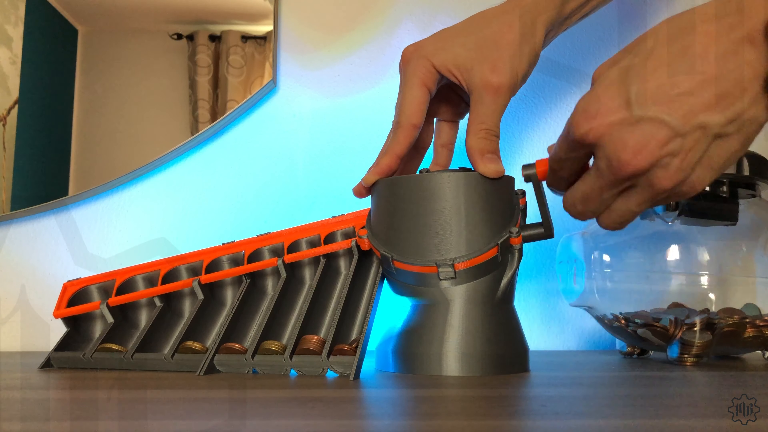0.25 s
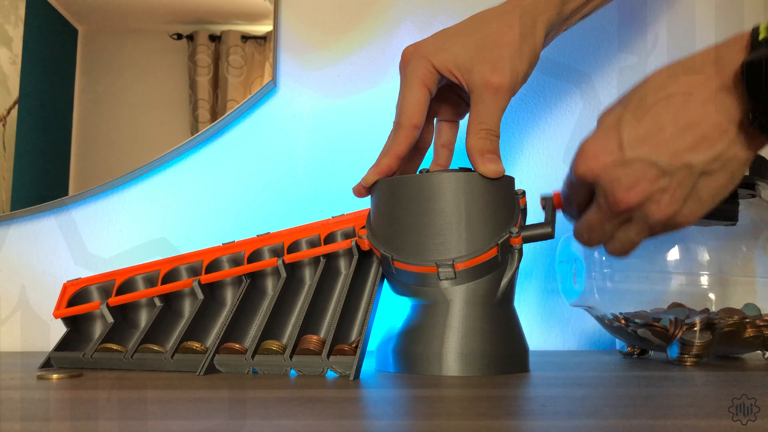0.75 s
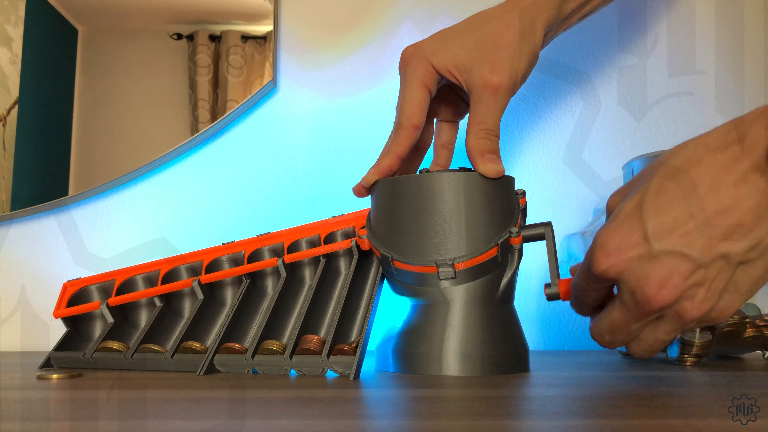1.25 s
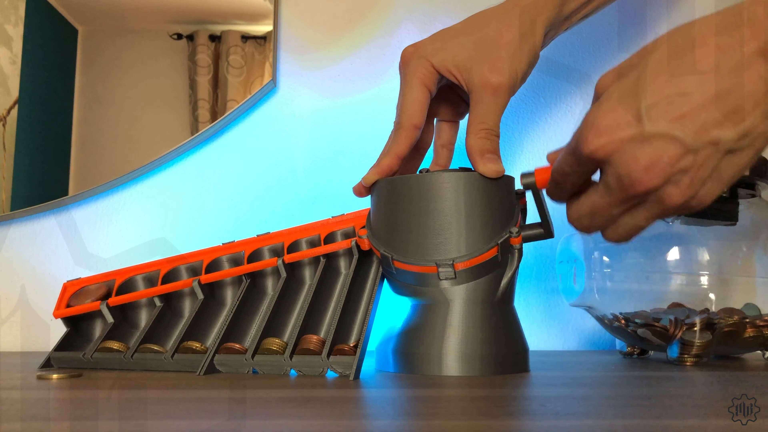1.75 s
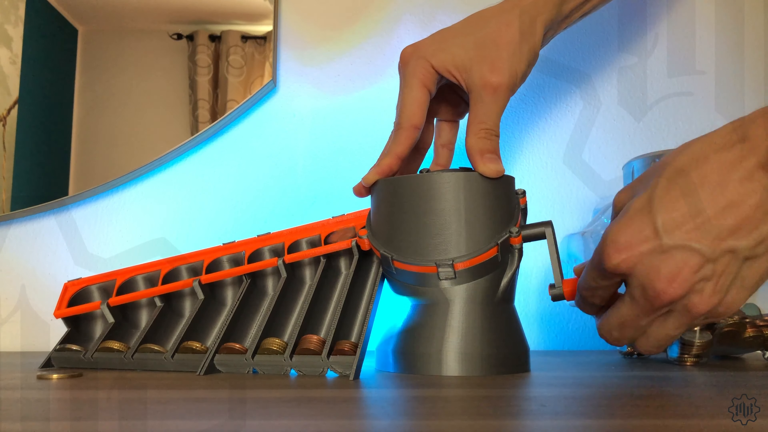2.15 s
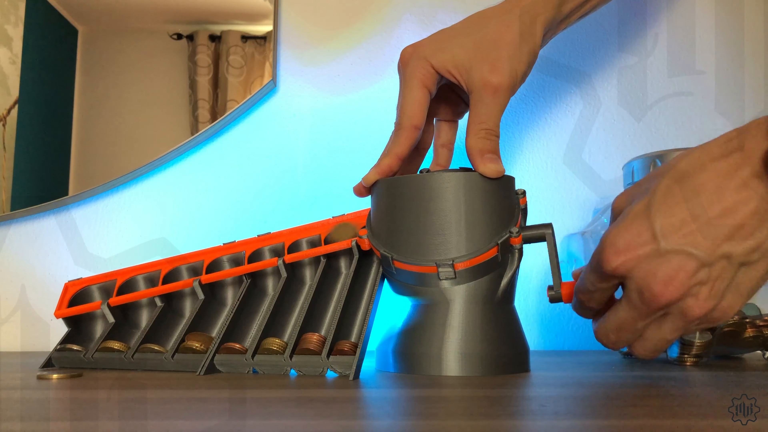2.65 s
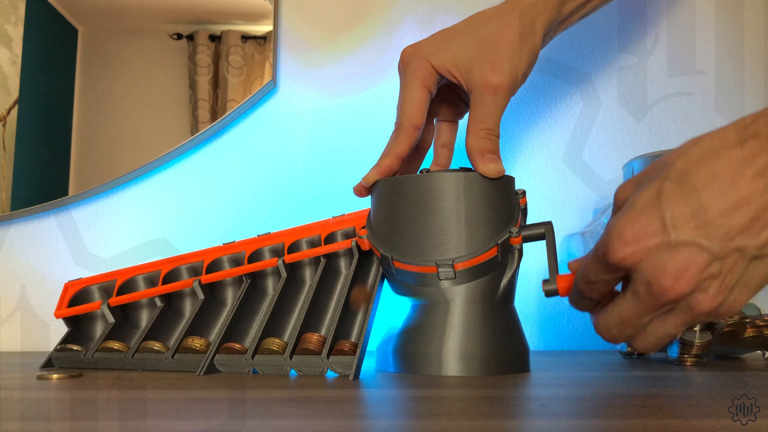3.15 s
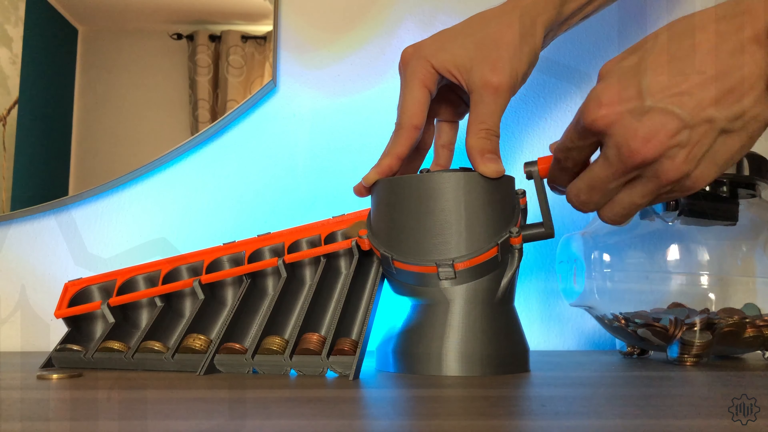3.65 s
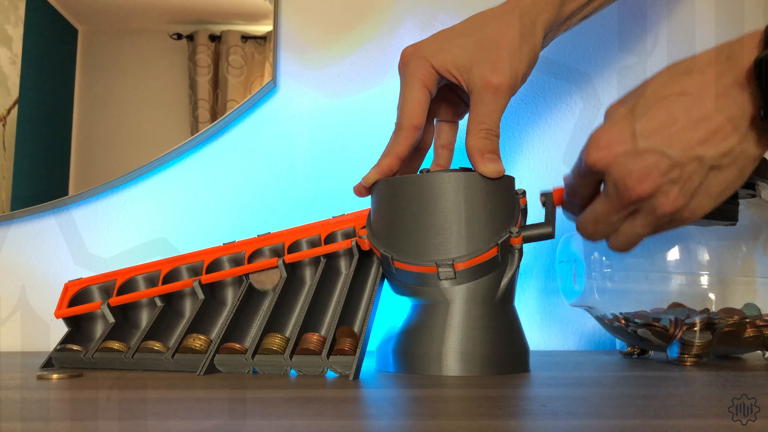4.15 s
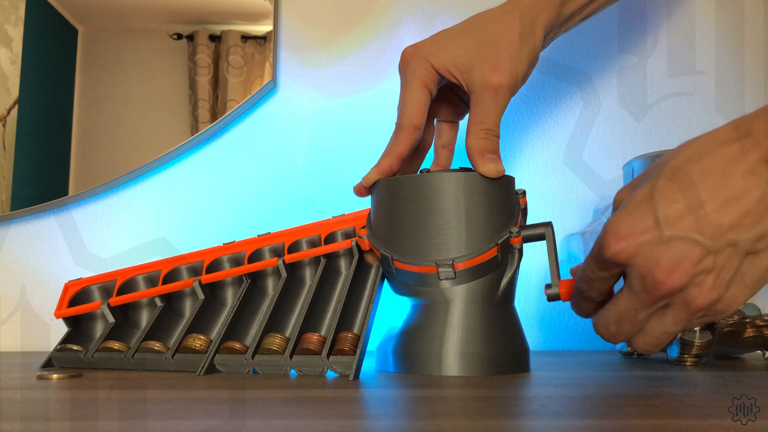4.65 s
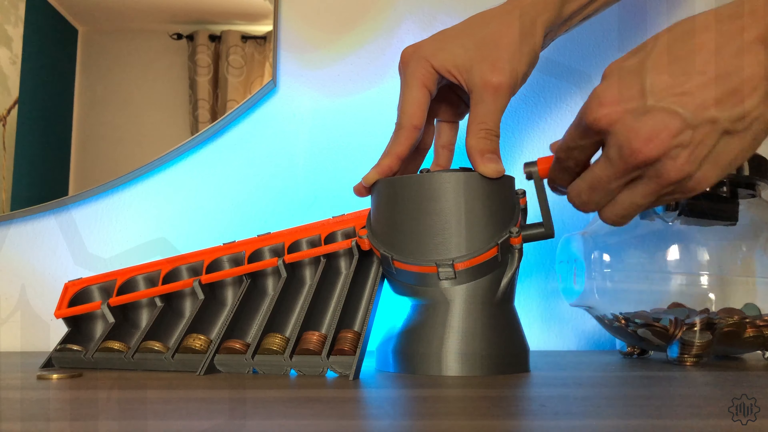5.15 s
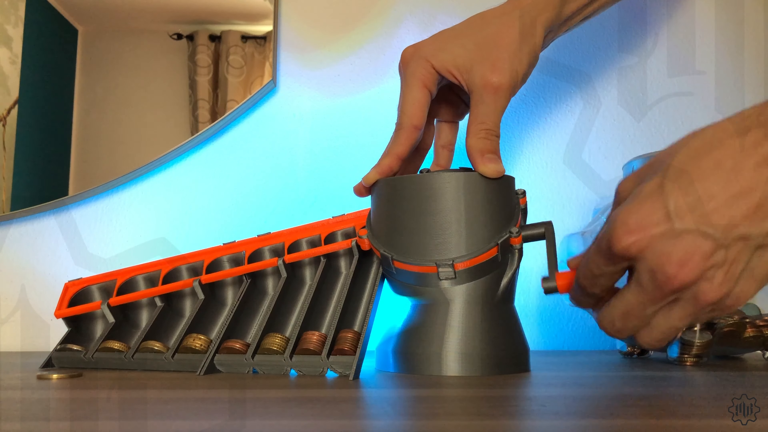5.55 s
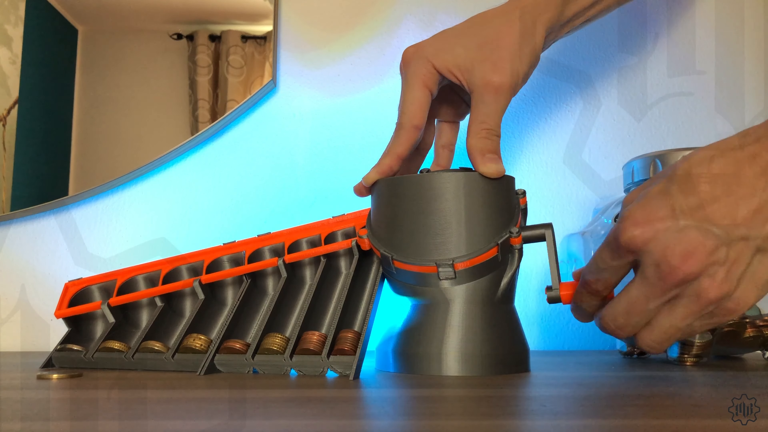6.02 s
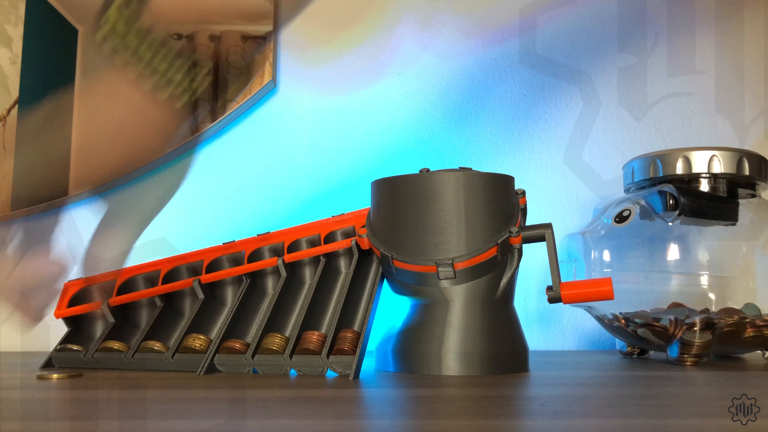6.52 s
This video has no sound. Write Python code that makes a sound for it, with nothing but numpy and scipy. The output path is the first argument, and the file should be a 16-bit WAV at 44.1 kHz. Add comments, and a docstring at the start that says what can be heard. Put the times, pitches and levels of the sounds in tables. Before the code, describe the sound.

Close, dry rattle of metal coins knocking and sliding in a hollow plastic hopper, stopping abruptly into quiet crank friction and a soft brush.

```python
"""Coins clatter in a hand-cranked plastic sorter on a table, miked close in a quiet room.
Each clack is a noise burst through the housing's resonances; slides and drag are dense grains through it.
Chinks, jingle and rim ticks add the metal: damped sine modes and dry clicks.
After five seconds the clatter gives way to a few faint clacks; the crank rubs on softly as filtered
friction, then hands bump and an arm brushes past, over steady room tone."""
import sys
import numpy as np
from scipy import signal
from scipy.fft import rfft, irfft
from scipy.io import wavfile
from scipy.ndimage import uniform_filter1d

SR = 44100
rng = np.random.default_rng(int(sys.argv[2]) if len(sys.argv) > 2 else 0)


def unload_wav(signal):
    """Save mono or channel-first audio to the path in sys.argv[1] as 16-bit WAV at rate SR, clipped to [-1, 1]."""
    wavfile.write(
        sys.argv[1],
        SR,
        np.round(np.clip(np.atleast_2d(signal).T, -1, 1) * 32767).astype(np.int16),
    )


N = 298998

# Levels are before the trims set in scene().
# still room, relative spectrum: [f/Hz, density/dB]
ROOM_TONE = [(15, -22.5), (25, -9.5), (70, 1.5), (210, -9), (400, -9), (750, -19), (2500, -25), (8000, -31),
             (14000, -32.5), (15500, -51)]
ROOM_TONE_DB = -72
# an arm brushing past: [t/s, level/dB]
BRUSH = [(6.34, -110), (6.38, -73), (6.43, -85), (6.52, -91), (6.62, -74.5), (6.7, -79), (6.78, -77.5)]
# spectrum of the brush: [f/Hz, level/dB]
BRUSH_COLOUR = [(100, 1.5), (600, 1), (2000, -6), (6000, -8), (12000, -12.5), (15500, -25)]
# hands bumping the sorter and the table: [t/s, level/dB, f/Hz, t60/s]
BUMPS = [(5.586, -55, 92, 0.19), (5.615, -61, 83.6, 0.2), (6.224, -71, 560, .08),
         (6.375, -64.5, 404, 0.055), (6.379, -64.5, 156, 0.1), (6.404, -73.5, 267, .08),
         (6.44, -67, 201, .1), (6.46, -68.5, 64.9, 0.15)]
# spectrum of the crank's friction, before the housing: [f/Hz, level/dB]
RUB_COLOUR = [(25, -26), (80, -8), (150, -19), (240, -6.5), (420, -11), (620, -1.5), (900, -4),
              (1200, -3.5), (1650, 0.5), (2000, -3.5), (3400, -8), (5500, -16.5), (9000, -26), (13000, -30),
              (15500, -47)]
# harder rubbing in parts of the crank's turn: [t/s, half width/s, level/dB, hiss over level/dB]
RUB_SWELLS = [(5.47, 0.059, -57, -7), (5.6, .05, -62.5, -23), (5.735, 0.078, -55, -13),
              (5.94, 0.041, -50, -16.5), (6.04, 0.018, -61, -6)]
FREE_RUN_S = (5.2, 6.065)   # from the last dense coins until the crank stops
RUB_DB, RUB_HISS_DB = -67, -6.5   # lightest rubbing; its hiss over that level
# close modes of a coin: [multiple of its pitch, level/dB, t60 of a freely bouncing coin/s]
COIN_MODES = [(.945, -6.5, .08), (1, -4, 0.058), (1.02, -4, 0.087), (.975, -12, .03)]
# coin ringing on coin: [t/s, level/dB, f/Hz, spacing unit of its bounces/s]
CHINKS = [(0.466, -28.5, 14000, 0.005), (0.66, -42, 13980, 0.003), (0.695, -41, 14000, 0.007),
          (1.106, -26, 13600, 0.0012), (1.118, -16.5, 13440, 0.0014), (1.585, -32.5, 15100, 0.009),
          (1.943, -39, 13240, 0.003), (2.304, -38, 13100, 0.001), (2.627, -32.5, 14000, 0.003),
          (2.855, -21.5, 14000, 0.0057), (3.093, -25, 13950, 0.0045), (3.507, -28.5, 13460, 0.007),
          (3.655, -32, 15400, 0.003), (3.837, -35, 15400, 0.0034), (4.289, -37, 15300, 0.0045),
          (4.592, -36, 12700, 0.0022), (4.784, -36, 13000, 0.001), (5.004, -40, 15100, 0.006)]
JINGLE_HZ = (12400, 15600)   # lowest and highest nominal ring among the sliding coins
# spectrum of a rim tick, before the housing: [f/Hz, level/dB]
TICK_COLOUR = [(300, -25.5), (1500, -14.5), (3500, 1), (8000, 6), (12000, 4), (15500, -13)]
# short coin slides: [start t/s, length/s, level/dB, rumble over level/dB, brightness over level/dB]
SLIDES = [(0.06, 0.016, -34, -9.5, -4.5), (.112, 0.048, -34, -8.5, -5.5), (0.174, 0.09, -40.5, -6, -8.5),
          (0.276, .018, -33, -6, -4), (0.318, 0.028, -31, -15, -17), (0.346, 0.094, -44.5, -0.5, -6.5),
          (0.467, 0.075, -30, -8, -8), (0.574, 0.03, -42, -4.5, -7), (0.648, 0.015, -38.5, -1, -3.5),
          (.682, 0.053, -34, -4.5, -5.5), (0.872, 0.048, -31.5, -10, -9.5), (0.984, 0.099, -38, -2, -6.5),
          (1.099, 0.04, -38, -3, -1), (1.2, 0.038, -34.5, -8, -7.5), (1.273, 0.049, -45, -7, -8.5),
          (1.392, 0.045, -42, 0, -9), (1.431, 0.032, -29, -7, -6.5), (1.525, 0.082, -40, -7, -7),
          (1.594, 0.025, -34, -5.5, -2), (1.642, 0.032, -32.5, -11, -13.5), (1.83, 0.077, -34.5, -10.5, -4),
          (1.934, 0.027, -35.5, -7, 2.5), (2.054, 0.056, -41.5, -4.5, -4), (2.157, 0.034, -28, -9, -11),
          (2.24, 0.091, -39.5, -9.5, -11), (2.387, 0.034, -35.5, -5.5, -11), (2.466, 0.11, -38.5, -11, -15),
          (2.524, 0.058, -33, -5.5, -14), (2.598, 0.048, -33.5, -6, -5.5), (2.687, 0.085, -35.5, -6.5, -9),
          (2.758, 0.13, -43, 0.5, -3.5), (2.837, 0.087, -35, -9, -9.5), (3.043, 0.016, -41.5, -5, 0.5),
          (3.086, 0.033, -30.5, -6.5, -7.5), (3.14, 0.13, -41.5, -15, -4.5),
          (3.262, 0.037, -41.5, -9.5, -8), (3.306, 0.072, -32, -11, -9), (3.446, 0.092, -33, -8.5, -5),
          (3.553, 0.029, -36.5, -8, -11.5), (3.599, 0.12, -33.5, -10, -9), (3.802, 0.064, -34.5, -12, -5.5),
          (3.932, 0.069, -38, -12, -9), (3.965, .085, -40.5, -12, -2.5), (4.097, 0.057, -34, -12, -11.5),
          (4.218, 0.099, -34, -9, -4.5), (4.33, 0.092, -39.5, -12, -7), (4.476, 0.084, -36, -14.5, -8),
          (4.585, 0.026, -44, -4, 4.5), (4.664, 0.039, -35, -12, -8), (4.729, 0.034, -37.5, -10, -3.5),
          (4.789, 0.0091, -44, -9, 6), (4.855, 0.027, -33.5, -12, -11), (4.953, 0.095, -35.5, -12, -5.5),
          (5.098, 0.035, -38.5, -10, -6.5), (5.163, 0.012, -39.5, -7, -4)]
SLIDE_ATTACK_S, SLIDE_RELEASE_S = 0.0074, 0.0083   # time constants before and after a slide
# dull grinding of the disc under the heap: [t/s, level/dB]
DRAG = [(0, -42), (.2, -45.5), (.66, -39), (.79, -47), (.96, -38), (1.17, -46), (1.34, -47), (1.55, -39),
        (1.94, -41), (1.995, -55), (2.07, -43), (2.13, -52.5), (2.22, -42.5), (2.36, -47.5), (2.6, -42.5),
        (3.4, -42.5), (3.75, -42.5), (4.62, -46.5), (4.93, -45.5), (5.18, -43)]
DRAG_RUMBLE_DB, DRAG_BRIGHT_DB = -3, -15   # over the level of the grinding
LAST_COIN_S = 0.0068   # time constant of the grinding's end
# spectrum of the hopper's churn, before the housing: [f/Hz, level/dB]
CHURN_COLOUR = [(25, -25.5), (55, -5.5), (100, 0.5), (170, -1), (350, -1), (900, 0), (1500, 3), (3000, 3.5),
                (4500, -1.5), (7500, -10), (10500, -17), (15500, -24)]
# resonances of the hollow plastic housing: [f/Hz, width/Hz, level/dB]
SHELL_MODES = [(125.2, 33, 1), (194, 20, 5), (231, 50, 7.5), (507, 160, 8), (634, 84, 6), (1281, 180, 5),
               (1676, 360, 7), (2410, 99, 1.5), (2750, 120, 2.5), (5780, 250, 1.5), (8540, 480, 2)]
# spectrum of a clack, before the housing: [f/Hz, level/dB]
CLACK_COLOUR = [(25, -40), (60, -28), (170, -4.5), (350, -8.5), (900, 0), (1500, 1), (3200, 6), (6500, -1),
                (9000, -6.5), (12000, -13.5), (15500, -20)]
# thin walls rattle on, stiff ribs crack at once: [spot f/Hz, energy share of the first contact 0-1]
STIFFNESS = [(1700, .25), (3200, 0.9), (9000, 0.8)]
# coins striking plastic: [t/s, level/dB, thud over level/dB, brightness over level/dB, spot f/Hz]
CLACKS = [(0.0729, -33, -5, -16, 2840), (0.1232, -30.5, -20, -2.5, 2620), (0.2029, -30.5, -16, -3, 3420),
          (0.221, -32.5, -25, -6, 3230), (0.2769, -50, 0.5, 21, 5850), (0.3069, -26.5, -19, -11, 2700),
          (0.4567, -40, 0, 2, 6700), (0.472, -27, -12, -4, 1440), (0.479, -27.5, -6.5, 4.5, 6060),
          (0.497, -25, -19.5, -6, 3000), (0.513, -25.5, -31.5, -9.5, 2770), (0.578, -35, -7.5, -13, 1680),
          (0.6834, -25.5, -9.5, -5, 2530), (0.6988, -25.5, -4.5, -25, 2580), (0.8858, -30, -8, -13, 1880),
          (1.051, -38, 1, 3.5, 6800), (1.1014, -26.5, -13, -5.5, 6700), (1.1154, -31, -13, 3.5, 7500),
          (1.2123, -31.5, -3, -16, 1860), (1.5189, -22.5, -29.5, -12, 3460), (1.5532, -32, -16, 2, 5060),
          (1.556, -26.5, -32.5, -6, 4940), (1.577, -29.5, -11, 0.5, 3100), (1.644, -27, -30, -14, 2660),
          (1.8799, -27, -19, -0.5, 6160), (2.0687, -34.5, -1.5, -12, 1800), (2.17, -28.5, -9.5, -9, 1810),
          (2.2578, -31, -31, -33, 3360), (2.3068, -31.5, -9.5, 5.5, 5760), (2.4672, -34, -23, -3, 3080),
          (2.551, -28, -11, -19, 1870), (2.6311, -29, -11, 5, 6400), (2.689, -28, -22, -6.5, 3000),
          (2.7279, -27.5, -7.5, -7, 1800), (2.802, -31.5, -5.5, -11, 1460), (2.859, -33, -3, 7, 7400),
          (2.901, -25.5, -23.5, -9.5, 2800), (3.0458, -27.5, -7.5, -8, 2880), (3.0924, -29, -6, 10, 5000),
          (3.2202, -30, -16.5, -7, 3080), (3.2602, -31.5, -8.5, 6.5, 8040), (3.3085, -29.5, -12, -15, 1850),
          (3.4655, -33.5, -4, -13, 1610), (3.5037, -40.5, -2, 9.5, 7900), (3.5995, -24, -23, -5.5, 3500),
          (3.6258, -27, -21, 0.5, 5200), (3.6495, -31, -12, 6, 9100), (3.7775, -23.5, -18.5, -9.5, 3600),
          (3.8094, -27, -2.5, -4.5, 3630), (3.8331, -30.5, -23, 4, 5570), (3.8403, -36.5, -55, 10, 10900),
          (3.9296, -28.5, -11, -11.5, 1750), (4.0423, -31, -3, 3, 11300), (4.1181, -32.5, -10, -4, 2500),
          (4.1362, -31.5, -31, -6, 2010), (4.2229, -28.5, -19, -6, 2910), (4.2922, -41, 7, 10, 8100),
          (4.2994, -38, -4.5, 3, 7800), (4.352, -35.5, -21, 3.5, 7700), (4.36, -30, -31, -6.5, 3000),
          (4.4014, -36, -11, 4, 9200), (4.4138, -39, 0, 2, 6300), (4.483, -32, -5, -8, 2760),
          (4.542, -37, -26, -3, 3060), (4.5852, -47, -3, 0, 5700), (4.683, -31.5, -14.5, -17, 1770),
          (4.7274, -31, -22, -1.5, 7100), (4.7867, -34, -3, 1.5, 6700), (4.8395, -31.5, -22, -6.5, 2720),
          (4.9484, -32.5, -10.5, -2.5, 8900), (4.99, -28.5, -10.5, 1, 8700), (5.0095, -35, -16, 5.5, 7500),
          (5.0904, -27.5, -15.5, -11, 3470), (5.1235, -31.5, -26, 1, 8660), (5.1627, -34.5, -6, 7.5, 5560),
          (5.174, -42, -12, -9, 1610), (5.8062, -58.5, -10, -1, 3600), (5.9514, -51, -23, -13, 1900),
          (6.0575, -58, 1, -23, 1774), (6.1732, -69, 5, -26.5, 1700), (6.434, -64, 0, -11, 1895),
          (6.4613, -70.5, 1, -9, 1820)]
BLOW_S = .01   # span over which the level of a blow counts
TOP_FOLLOWS, DULL_DB = 0.38, -7.5   # top-octave lift in dB per dB of brightness above a dull blow's
REGISTER_EDGES_HZ = (1000, 5000)   # boom | clack | edge
CUTOFF_HZ = 16000


def from_db(db):
    """Decibels to gain."""
    return 10 ** (np.asarray(db) / 20)


def unit(x):
    """Scale to an energy of one."""
    return x / np.sqrt(np.sum(x ** 2) + 1e-20)


def at_hz(points, hz):
    """Read a curve on a log-frequency axis."""
    f, values = np.transpose(points)
    return np.interp(np.log(hz + 1), np.log(f), values)


def in_time(rows):
    """Columns of a time curve, sample by sample."""
    s, *columns = np.transpose(rows)
    return [np.interp(np.arange(N) / SR, s, column) for column in columns]


def add(out, s, sound):
    """Mix a sound in at its time."""
    i = max(round(s * SR), 0)
    out[i:i + len(sound)] += sound[:N - i]


def bins(x):
    """Frequencies of a sound's spectrum."""
    return np.fft.rfftfreq(len(x), 1 / SR)


def coloured(x, db):
    """Causal (minimum-phase) filter with the given gain per bin: nothing sounds early."""
    cepstrum = irfft(np.log(from_db(db)))
    half = len(x) // 2
    cepstrum[1:half] *= 2
    cepstrum[half + 1:] = 0
    return irfft(rfft(x) * np.exp(rfft(cepstrum)))


def peak(f, hz, width):
    """Bell of a resonance, height one."""
    return 1 / (1 + (2 * (f - hz) / width) ** 2)


def during(start, end, attack_s, release_s):
    """One from start to end, rising before and dying after."""
    t = np.arange(N) / SR
    before = np.maximum(start - t, 0) / attack_s
    after = np.maximum(t - end, 0) / release_s
    return np.exp(-np.minimum(before + after, 30))


def registers(x):
    """Split into the housing's boom, the plastic's clack and the coins' edge."""
    def steep(v, hz, kind):
        sos = signal.butter(2, hz, kind, fs=SR, output="sos")
        return signal.sosfilt(np.vstack([sos, sos]), v + 1e-18)
    low, high = REGISTER_EDGES_HZ
    upper = steep(x, low, "high")
    return np.array([steep(x, low, "low"), steep(upper, high, "low"), steep(upper, high, "high")])


def evened(x, span_s):
    """The three registers, each at a running level of one; the fine grain stays."""
    parts = registers(x)
    power = uniform_filter1d(parts ** 2, max(int(span_s * SR), 2), axis=1)
    return parts / np.sqrt(np.maximum(power, 1e-12))


def grains(per_s, size_db):
    """Tiny slips and knocks at random moments, most of them small."""
    sizes = from_db(size_db * np.minimum(rng.exponential(1, N), 5))
    signed = sizes * rng.choice([-1, 1], N)
    return signed * (rng.random(N) < per_s / SR)


def dying(t, t60):
    """Decaying noise, like countless close modes dying together; energy one."""
    return unit(rng.standard_normal(len(t)) * from_db(-60 * t / t60))


def shell_db(f):
    """The housing's resonances as gain in dB, shared by contacts on it and the crank's rub."""
    return sum(db * peak(f, hz, width) for hz, width, db in SHELL_MODES)


def contact(colour, share, crack_t60, rattle_t60, boom_t60, boom_db, room_db, room_t60, local_db,
            size=8192, count=8):
    """One touch on the housing: a crack, a fast rattle of the walls, a longer boom and a little room."""
    t = np.arange(size) / SR
    f = bins(t)
    share = np.clip(share, .02, .95)
    crack = unit(from_db(-10.5) * (t == 0) + dying(t, crack_t60))   # the rim bites, then buzzes on the wall
    rattle = unit(dying(t, rattle_t60) * (1 - np.exp(-t / 0.0017)))
    boom = signal.sosfilt(signal.butter(2, 1700, fs=SR, output="sos"), dying(t, boom_t60))
    room = dying(t, room_t60) * (1 - np.exp(-t / 0.0074))
    touch = np.sqrt(share) * crack + np.sqrt(1 - share) * rattle
    touch = touch + from_db(boom_db) * boom + from_db(room_db) * room
    # the struck rib or wall colours the touch with a few resonances of its own
    local_hz = np.exp(rng.uniform(np.log(900), np.log(10000), count))
    local = np.max([peak(f, hz, 100 + 0.085 * hz) for hz in local_hz], axis=0)
    return coloured(touch, at_hz(colour, f) + shell_db(f) + local_db * local)


def hush(colour):
    """Smooth noise of a given colour, rms one."""
    white = rng.standard_normal(N)
    shaped = irfft(rfft(white) * from_db(at_hz(colour, bins(white))), N)
    return np.sqrt(N) * unit(shaped)


def room_tone():
    """The still room behind the sorter: steady, mostly low noise."""
    return from_db(ROOM_TONE_DB) * hush(ROOM_TONE)


def brush():
    """An arm brushing past: smooth friction noise with a changing level."""
    level_db, = in_time(BRUSH)
    return from_db(level_db) * hush(BRUSH_COLOUR)


def bumps(rise_s):
    """Soft skin on plastic and wood: dull, short thumps of resonant noise."""
    out, t = np.zeros(N), np.arange(8192) / SR
    for s, level_db, hz, t60 in BUMPS:
        soft = dying(t, t60) * (1 - np.exp(-t / rise_s))
        thump = coloured(soft, 20 * np.log10(peak(bins(t), hz, 0.64 * hz)))
        add(out, s, from_db(level_db) * np.sqrt(2 * BLOW_S * SR) * unit(thump))
    return out


def rub(per_s, size_db, trim_db):
    """The crank running light: fine, even friction excites the housing and swells in parts of its turn."""
    slips = grains(per_s, size_db)
    f = bins(slips)
    sound = irfft(rfft(slips) * from_db(at_hz(RUB_COLOUR, f) + shell_db(f)), N)
    t = np.arange(N) / SR
    power = from_db(RUB_DB + np.array([[0], [0], [RUB_HISS_DB]])) ** 2   # one row per register
    for s, width, level_db, hiss_db in RUB_SWELLS:
        swell = np.exp(-np.minimum(((t - s) / width) ** 2, 20))
        power = power + from_db(level_db + np.array([[0], [0], [hiss_db]])) ** 2 * swell
    friction = from_db(trim_db) @ (evened(sound, 0.14) * np.sqrt(power))
    return friction * during(*FREE_RUN_S, attack_s=.01, release_s=.008)


def jingle(gain, per_s, size_db, ring_t60, jingle_db, count=14):
    """Sliding coins keep nudging each other into faint, quickly damped rings."""
    touches, coin = grains(per_s, size_db), rng.integers(0, count, N)
    t, out = np.arange(4096) / SR, np.zeros(N)
    for k, hz in enumerate(np.geomspace(*JINGLE_HZ, count)):
        ring = sum(from_db(db - 60 * t / ring_t60) * np.sin(2 * np.pi * hz * multiple * t)
                   for multiple, db, _ in COIN_MODES)
        out += signal.oaconvolve(touches * gain * (coin == k), unit(ring))[:N]
    return from_db(jingle_db) * out / np.sqrt(np.mean(touches ** 2) + 1e-20)


def chinks(ring_db, detune, pinned_s, count=9):
    """A coin chatters on its neighbours and rings very high; one that can hardly bounce is damped sooner."""
    out, t = np.zeros(N), np.arange(SR // 4) / SR
    for s, level_db, hz, spread in CHINKS:
        offsets = np.linspace(-3.4, 2.2, count) + rng.uniform(-0.12, 0.14, count)   # in spacing units
        freedom = spread / (spread + pinned_s)
        sound = np.zeros(len(t))
        for offset in offsets:
            age = np.maximum(t - (offset - offsets[0]) * spread, 0)
            force_db = -5.5 * abs(offset)   # it grazes first, lands, then settles
            for multiple, db, t60 in COIN_MODES:
                pitch = hz * multiple * (1 + detune * rng.standard_normal())
                mode_db = force_db + db + rng.normal(0, 1) - 60 * age / (t60 * freedom)
                sound += from_db(mode_db) * np.sin(2 * np.pi * pitch * age)
        gain = from_db(level_db + ring_db) * np.sqrt(BLOW_S * SR)
        add(out, s + offsets[0] * spread, gain * unit(sound))
    return out


def stir():
    """Gains of rumble, clatter and edge in the hopper: the disc's drag, with the slides on top."""
    power = np.zeros((3, N))
    lead, t = .05, np.arange(SR // 3) / SR   # lead leaves room for the attack
    for s, length, level_db, rumble_db, bright_db in SLIDES:
        before = np.maximum(lead - t, 0) / SLIDE_ATTACK_S
        after = np.maximum(t - lead - length, 0) / SLIDE_RELEASE_S
        shape = np.exp(-before - after)
        for register, db in zip(power, (rumble_db, 0, bright_db)):
            add(register, s - lead, (from_db(level_db + db) * shape) ** 2)
    drag_db, = in_time(DRAG)
    drag = from_db([drag_db + DRAG_RUMBLE_DB, drag_db, drag_db + DRAG_BRIGHT_DB])
    drag = drag * during(0, DRAG[-1][0], SLIDE_ATTACK_S, LAST_COIN_S)
    return np.sqrt(power + drag ** 2)


def edge_ticks(gain, per_s, size_db, tick_db, count=8):
    """Milled rims flick past one another: single dry ticks that follow the stir in the hopper."""
    touches, spot = grains(per_s, size_db), rng.integers(0, count, N)
    out = np.zeros(N)
    for k in range(count):
        body = contact(TICK_COLOUR, 0.67, crack_t60=0.0032, rattle_t60=.012, boom_t60=.03, boom_db=-9.0,
                       room_db=-21.5, room_t60=.12, local_db=10)
        out += signal.oaconvolve(touches * (spot == k), unit(body))[:N]
    return np.sqrt(N) * unit(out) * gain * from_db(tick_db)


def churn(gains, per_s, size_db, stay_s, even_s, trim_db, count=26):
    """Coins scrape and chatter on one spot of the hopper for a moment, then tumble on to another."""
    touches = grains(per_s, size_db)
    # jitter blurs the passage from one spot to the next
    moment = np.abs(np.arange(N) / (stay_s * SR) + .3 * rng.standard_normal(N)).astype(int)
    spot = rng.integers(0, count, N)[moment]
    tumble = np.zeros(N)
    for k in range(count):
        body = contact(CHURN_COLOUR, 0.52, crack_t60=0.0018, rattle_t60=0.013, boom_t60=0.1, boom_db=-1,
                       room_db=-11.5, room_t60=0.56, local_db=-0.5)
        tumble += signal.oaconvolve(touches * (spot == k), unit(body))[:N]
    return from_db(trim_db) @ (evened(tumble, even_s) * gains)


def clacks(spot_db, spot_width, trim_db):
    """Each coin hits its own spot of the plastic, with its own weight and hardness."""
    out = np.zeros(N)
    blow = round(BLOW_S * SR)
    for s, level_db, thud_db, bright_db, hz in CLACKS:
        hit = contact(CLACK_COLOUR, at_hz(STIFFNESS, hz), crack_t60=0.007, rattle_t60=0.024, boom_t60=0.13,
                      boom_db=-4.0, room_db=-26, room_t60=.1, local_db=4.5)
        f = bins(hit)
        hit = coloured(hit, spot_db * peak(f, hz, spot_width * hz))
        boom, clack, edge = registers(hit) ** 2
        # the slow thud counts in full, clack and edge only within the blow
        energy = np.array([boom.sum(), clack[:blow].sum(), edge[:blow].sum()])
        own_db = 10 * np.log10(energy / blow)
        low, mid, high = level_db + np.array([thud_db, 0, bright_db]) + trim_db - own_db
        top = high + TOP_FOLLOWS * max(bright_db - DULL_DB, 0)
        balance = [(700, low), (1300, mid), (4000, mid), (6200, high), (13000, top)]
        add(out, s, -coloured(hit, at_hz(balance, f)))
    return out


def scene():
    """The sorter on its table, heard close by one microphone; three-part trims are boom, clack, edge in dB."""
    hands = bumps(rise_s=0.003) + brush()
    crank = rub(per_s=1800, size_db=2.0, trim_db=np.array([-1.5, -2, -1.5]))
    gains = stir()
    coins = jingle(gains[2], per_s=630, size_db=4.5, ring_t60=0.03, jingle_db=-17)
    coins += chinks(ring_db=0.6, detune=0.0055, pinned_s=0.00038)
    hopper = edge_ticks(gains[2], per_s=130, size_db=3.5, tick_db=0.0)
    hopper += churn(gains, per_s=3200, size_db=4.0, stay_s=.011, even_s=0.045,
                    trim_db=np.array([.1, -.6, -1.5]))
    hits = clacks(spot_db=8.5, spot_width=0.26, trim_db=np.array([2.2, -.8, -.3]))
    return (room_tone() + hands + crank + coins + hopper + hits)[None]


def record(dry):
    """The highest peaks are rounded and the top is cut steeply."""
    ceiling = .6   # full scale is 1
    rounded = dry / (1 + (dry / ceiling) ** 4) ** (1 / 4)
    return signal.sosfilt(signal.ellip(10, .2, 80, CUTOFF_HZ, fs=SR, output="sos"), rounded)


dry = scene()
out = record(dry)
unload_wav(out)
```